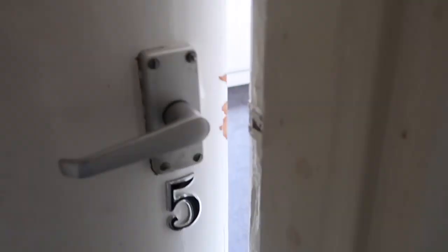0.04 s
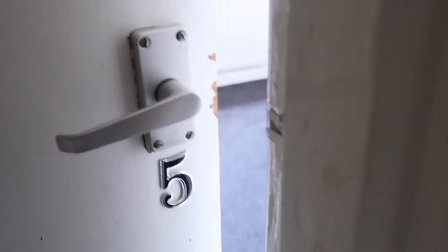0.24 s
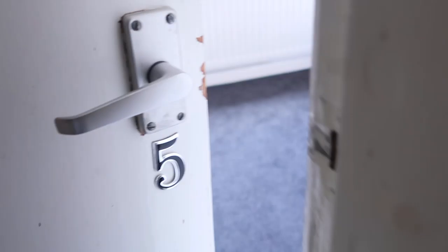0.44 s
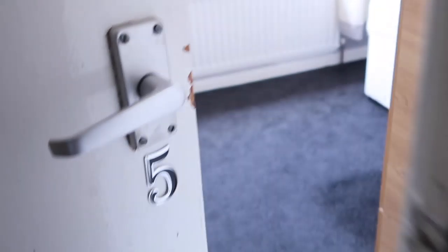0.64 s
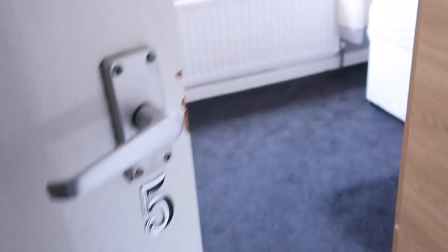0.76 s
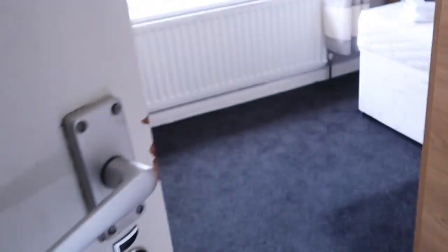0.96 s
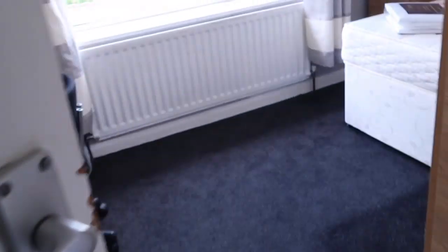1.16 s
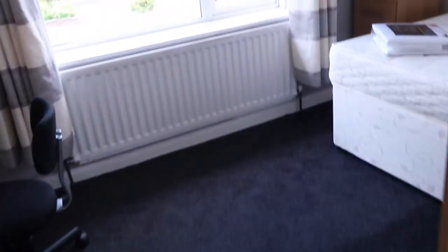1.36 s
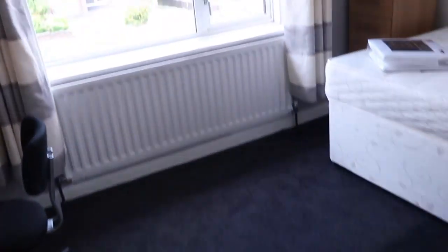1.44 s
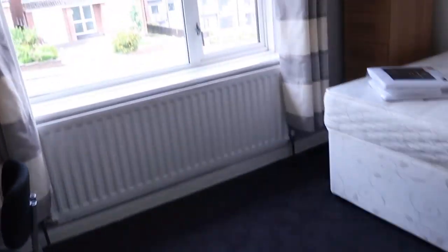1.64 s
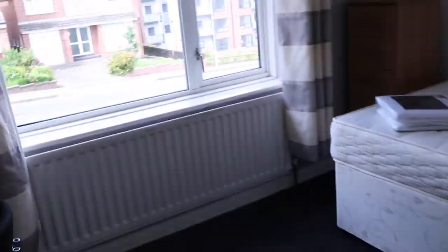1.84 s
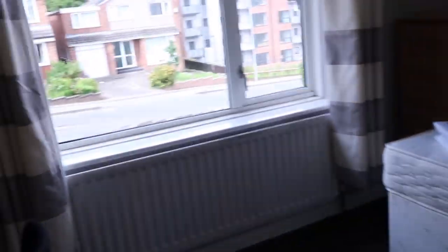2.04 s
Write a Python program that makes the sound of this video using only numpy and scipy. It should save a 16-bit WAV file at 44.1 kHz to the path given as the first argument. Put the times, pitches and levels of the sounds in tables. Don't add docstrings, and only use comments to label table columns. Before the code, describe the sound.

Squeaky door hinge: two short squeals, a falling groan, a latch snap and a late creak

```python
import sys
import numpy as np
from scipy import signal
from scipy.fft import rfft, irfft
from scipy.io import wavfile
from scipy.ndimage import uniform_filter1d

SR = 44100
rng = np.random.default_rng(int(sys.argv[2]) if len(sys.argv) > 2 else 0)


def int16_out(signal):
    q = np.round(np.clip(np.atleast_2d(signal).T, -1, 1) * 32767)
    wavfile.write(sys.argv[1], SR, q.astype(np.int16))


def volts(x):
    e = np.asarray(x, float) / 20
    return 10 ** e


N = 92962
T = np.arange(N) / SR
PORTS = np.array([[.5], [-.5]])


def shade(table, hz):
    table = np.array(table)
    return np.interp(np.log(np.maximum(hz, 1)), np.log(table[:, 0]), table[:, 1])


def unit(x):
    return x / np.sqrt(np.mean(x ** 2))


def noise(table):
    gain = volts(shade(table, np.fft.rfftfreq(N, 1 / SR)))
    return unit(irfft(rfft(rng.standard_normal(N)) * gain, N))


def band(x, hz, width_hz):
    return signal.lfilter(*signal.iirpeak(hz, hz / width_hz, fs=SR), x)


def bandpass(x, order, low_hz, high_hz):
    return signal.sosfilt(signal.butter(order, [low_hz, high_hz], "band", fs=SR, output="sos"), x)


def highpass(x, hz):
    return signal.lfilter(*signal.butter(2, hz, "high", fs=SR), x)


def walk(rate_hz, size=N):
    k = int(SR / rate_hz)
    drift = uniform_filter1d(rng.standard_normal(size + SR // 4), k)
    return unit(uniform_filter1d(drift, k))[:size]


def gate(start, end, edge_s):
    return np.clip(np.minimum(T - start, end - T) / edge_s + .5, 0, 1)


# hz, level_db (per Hz)
HUSH_MID_COLOUR = [(30, -23.5), (70, -6), (320, -0.5), (655, -11), (1560, -14), (5500, -24.5),
                   (8000, -30.5), (14000, -45)]
HUSH_SIDE_COLOUR = [(30, -36), (350, 6), (513, -4.5), (1400, -12), (3200, -15.5), (6000, -22), (9000, -30),
                    (14500, -40)]


def hush():
    return volts(-72) * noise(HUSH_MID_COLOUR), volts(-69.5) * noise(HUSH_SIDE_COLOUR)


# start_s, level_db
RUSTLE_LEVEL = [(0, -64), (.14, -66), (.36, -80.5), (1.2, -66), (1.35, -60), (1.6, -69), (1.8, -64.5),
                (2.11, -58.5)]
# hz, level_db (per Hz)
RUSTLE_COLOUR = [(24, -34), (119, -7), (243, -2.5), (574, -12), (900, -11), (5500, -31), (9000, -43),
                 (14000, -60.5)]


def rustle():
    level = volts(np.interp(T, *np.array(RUSTLE_LEVEL).T) + 4.4 * walk(53))
    return level * noise(RUSTLE_COLOUR), volts(-6.5) * level * noise(RUSTLE_COLOUR)


# peak_time_s, peak_db, pitch_hz, length_s, left_minus_right_db
CASING_BUMPS = [(0.404, -34, 142, 0.0076, -6), (0.417, -34.5, 133, 0.0095, 1), (0.473, -53, 92, 0.021, -1),
                (0.491, -38, 91, 0.0088, 1), (0.505, -32.5, 112, 0.0095, 2.5),
                (0.526, -24, 118, 0.012, 5.5), (.538, -26, 191, 0.014, -1.5), (0.546, -29.5, 164, 0.015, 6),
                (.535, -29.5, 326, 0.0082, 3.5), (0.561, -42.5, 150, 0.012, 5),
                (0.586, -47.5, 90, 0.017, -1.5), (0.601, -45.5, 75, 0.016, 4),
                (.612, -45.5, 91, 0.013, -5.5), (.64, -57, 130, 0.031, 8.5),
                (0.681, -46.5, 106, 0.014, 8.5), (0.7, -45, 119, 0.011, 3), (0.716, -56.5, 102, 0.027, -9),
                (0.978, -44.5, 139, 0.011, -4), (1.644, -57, 318, 0.0027, 8), (1.702, -47, 350, 0.006, -6),
                (1.717, -67, 300, 0.0026, 18), (1.811, -43, 220, 0.006, 1.5),
                (1.826, -43.5, 139, 0.0074, -1)]


def bumps():
    lag_s = .0012
    out = np.zeros((2, N))
    for s, db, hz, length_s, pan_db in CASING_BUMPS:
        envelope = np.exp(-(2 * (T - s) / length_s) ** 2)
        arrival = T - s - PORTS * np.tanh(pan_db) * lag_s
        out += volts(db + PORTS * pan_db) * envelope * np.cos(2 * np.pi * hz * arrival)
    return out


# start_s, peak_db, centre_hz, width_hz, decay_s
BOARD_TICKS = [(1.83, -47.5, 955, 297, 0.011), (0.31, -59, 645, 1126, 0.0087), (.742, -41, 1442, 697, 0.02),
               (.882, -39, 1400, 1710, 0.048), (1.99, -55.5, 3550, 300, 0.032),
               (1.451, -37, 1860, 2720, 0.028), (1.455, -60.5, 5560, 1490, 0.012),
               (1.46, -46, 313, 283, 0.024), (1.6565, -40, 2250, 870, 0.0015),
               (1.657, -51.5, 3850, 595, 0.0018), (1.6575, -49.5, 4520, 790, 0.0016)]
# start_s, peak_db, centre_hz, width_hz, decay_s
CLOSE_TICKS = [(.8, -66, 10550, 2470, 0.03), (.85, -64, 7500, 1034, 0.026), (1.16, -68, 9600, 2570, 0.019),
               (1.449, -62, 11300, 1600, 0.012), (1.45, -68, 8200, 1800, 0.01),
               (1.031, -49, 9900, 1800, 0.0016), (1.0315, -51, 11700, 1500, .0014),
               (1.031, -60, 6800, 3000, .001), (1.657, -54, 4350, 1400, 0.0015)]


def ticks(table):
    out = np.zeros(N)
    for s, db, hz, width_hz, decay_s in table:
        burst = rng.standard_normal(N) * (T > s) * np.exp(-np.abs(T - s) / decay_s)
        burst = bandpass(burst, 3, max(hz - width_hz / 2, 40), hz + width_hz / 2)
        out += volts(db) * burst / np.abs(burst).max()
    return out


# pitch_hz, level_db, decay_s
LATCH_MODES = [(750, -23, 0.0037), (1065, -1.5, 0.0035), (1553, -2.5, 0.0034), (1770, 9.5, 0.0022),
               (2250, 6.5, 0.0019), (2596, 7.5, 0.0028), (3070, -6, 0.0015), (3550, 1.5, 0.0028)]
# start_s, level_db
LATCH_CONTACTS = [
    (1.449, 0),
    (1.4505, 8),
    (1.4535, -20),
    (1.4583, 3),
    (1.4645, -7),
    (1.4708, -11),
    (1.4766, -6),
    (1.4886, -14),
    (1.494, -14),
    (1.506, -35),
]


def latch():
    t = T[:SR // 8]
    ring = sum(volts(db) * np.exp(-t / decay_s) * np.sin(2 * np.pi * hz * t) for hz, db, decay_s in LATCH_MODES)
    contact_s = .0009
    touch = sum(volts(db) * (T > s) * np.exp(-np.abs(T - s) / contact_s) for s, db in LATCH_CONTACTS)
    out = signal.fftconvolve(rng.standard_normal(N) * touch, ring)[:N]
    out = bandpass(out, 4, 600, 3900)
    return volts(-26) * out / np.abs(out).max()


# start_s, level_db, treble_db
CREAK_LEVEL = [
    (1.832, -48.5, -35),
    (1.857, -41.5, 3.5),
    (1.893, -36.5, 6),
    (1.932, -43, 4.5),
    (1.954, -39.5, 0),
    (1.968, -38, -5),
    (2, -41, 3),
    (2.07, -49, -12),
    (2.108, -46.5, -6),
]
# pitch_hz, width_hz, level_db
CREAK_BODY = [(347, 102, 1.5), (797, 140, -2), (1400, 230, -14), (1734, 330, -8), (2223, 177, -1),
              (3660, 560, -31), (4340, 310, -21.5)]


def creak():
    rate_hz, spacing_scatter, size_db = 520, .38, .5
    chance = rng.standard_normal((900, 2))
    at = (np.cumsum(np.exp(spacing_scatter * chance[:, 0]) / rate_hz) * SR).astype(int)
    slips = 0.091 * rng.standard_normal(N)
    slips[at[at < N]] += volts(size_db * chance[at < N, 1])
    s, level_db, treble_db = np.array(CREAK_LEVEL).T
    wood = np.zeros(N)
    for k, (hz, width_hz, db) in enumerate(CREAK_BODY):
        mode = unit(band(band(slips, hz, 1.63 * width_hz), hz, 1.67 * width_hz))
        mode_db = db + 2.1 * walk(50) + (hz > 4000) * np.interp(T, s, treble_db)
        wood += (-1) ** k * volts(mode_db) * mode
    return unit(wood) * volts(np.interp(T, s, level_db)) * gate(s[0], 3, 0.013)


# pitch_hz, width_hz, lift_db
LEAF_MODES = [(1456, 110, 7), (1762, 58, 9.5), (2010, 46, 2.5), (2418, 28, -14), (2550, 85, 5.5),
              (3113, 25, 12.5), (3860, 110, 7)]


def panel(hz):
    return sum(db / (1 + ((hz - f) / w) ** 2) for f, w, db in LEAF_MODES)


# hz, level_db
DOOR_RADIATION = [(200, -42), (450, -5.5), (1180, -3.5), (1800, -11), (2400, -12), (3300, -17),
                  (4800, -16.5), (6400, -48.5), (8000, -57.5)]


def hinge(stroke, tint):
    s, *controls = np.array(stroke).T
    size = SR // 4
    span = int(s[0] * SR) - 200 + np.arange(size)
    hz, db, bright, rough, even = (np.interp(T[span], s, v) for v in controls)
    rough = np.clip(rough, 0, 1)
    jitter = .055 * rough ** 2 * walk(260, size)
    phase = 2 * np.pi * np.cumsum(hz * (1 + jitter)) / SR
    cycles = np.sqrt(2) * np.sin(phase)
    for k in range(2, 16):
        gain_db = bright * np.log2(k) + even * (k % 2 == 0)
        gain_db = gain_db + shade(DOOR_RADIATION, k * hz) + shade(tint, k * hz) + panel(k * hz)
        wander_db = 3 * walk(50, size)
        breakup_db = 8 * rough * (np.tanh(2 * walk(170, size)) - 1)
        partial = np.sin(k * phase + rng.uniform(0, 2 * np.pi))
        cycles = cycles + np.sqrt(2) * volts(gain_db + wander_db + breakup_db) * partial
    cycles = cycles + rough * volts(-8 + bright) * noise(DOOR_RADIATION)[span] * (1 + np.cos(phase))
    out = np.zeros(N)
    out[span] = cycles * volts(db + 11 * rough ** 2 * np.tanh(2 * walk(150, size)))
    return out * gate(s[0], s[-1], .004)


# start_s, slip_rate_hz, level_db, brightness_db (per octave), roughness (0-1), even_overtones_db
LOW_SQUEAL = [
    (.738, 673.4, -37, -23, 0, -9.5),
    (.747, 592.8, -41, -3, 0.2, -5),
    (.757, 579.6, -30, -8, 0, -14.5),
    (.776, 580, -39, -5.5, .1, -11),
    (.788, 580, -41, -6, 0.2, 3.5),
    (.822, 573.5, -36.5, -12, 0.11, 1),
    (.85, 560.2, -32.5, -5.5, 0.3, -1),
    (.874, 600, -30.5, -5, 0.3, -2.5),
    (.888, 630, -38, -1, 0.3, 1.5),
]
JUMP = [
    (.884, 800, -36, -14, 0.52, -9),
    (.895, 778, -31, -4, 0.51, -6.5),
    (.91, 777.4, -32, -6, 0.32, 1.5),
    (.93, 773, -42.5, -2, 0.15, -1.5),
    (.942, 780, -55, 2.5, 0.24, 7),
    (.95, 758, -43, -0.5, 0.12, 7.5),
]
HIGH_SQUEAL = [
    (.948, 773, -36, -6.5, .15, 9),
    (.956, 765, -31.5, -13, 0.15, -3.5),
    (0.966, 757.5, -29, -8.5, .12, 0),
    (.981, 751.2, -36.5, -6.5, .1, -24),
    (0.991, 754.4, -31.5, -9, 0.1, 0),
    (1.006, 752, -35.5, -10.5, .1, -7.5),
    (1.022, 767, -41.5, -15.5, .1, -2.5),
    (1.045, 801, -51, -3.5, 0.1, 3.5),
]
LAST_SQUEAL = [
    (1.041, 785, -44.5, -9.5, 0.092, -4.5),
    (1.055, 791, -36, -10.5, .1, -7.5),
    (1.066, 797.5, -28.5, -12, 0.13, -2.5),
    (1.082, 817.5, -34, -4.5, 0.073, -0.5),
    (1.104, 828.4, -38, -11, .1, 7),
    (1.117, 804, -32.5, -10.5, 0.16, -2.5),
    (1.124, 800, -36.5, -5, 0.19, -13),
    (1.132, 745, -41.5, -2.5, 0.24, -7),
]
# hz, level_db
SQUEAL_TINT = [(900, 1), (1800, 2.5), (2350, 5.5), (2900, -1), (3500, 5), (4050, 0.5), (4700, -5.5),
               (6000, -4)]
FLAT = [(100, 0), (20000, 0)]


def squeals():
    low = hinge(LOW_SQUEAL, SQUEAL_TINT)
    out = low + volts(-4.5) * band(low, 580, 10.8)
    return out + sum(hinge(stroke, FLAT) for stroke in (JUMP, HIGH_SQUEAL, LAST_SQUEAL))


# start_s, slip_rate_hz, level_db, brightness_db (per octave), roughness (0-1), even_overtones_db
GROAN = [
    (1.132, 759.7, -42.5, -1, 0.46, -2.5),
    (1.141, 731, -34.5, -5.5, 0.65, 3),
    (1.155, 683.7, -41, 1, 0.25, -6.5),
    (1.161, 592, -38, 0.5, 0.57, 1.5),
    (1.166, 571.7, -38.5, -2.5, 0.44, 2),
    (1.186, 539.3, -37, -2.5, 1, -8),
    (1.193, 516.6, -42.5, 2.5, .7, -2.5),
    (1.212, 493.5, -44.5, 2, .8, 1),
]
GROAN_END = [
    (1.212, 431, -50.5, 4.5, 0.72, 0),
    (1.222, 410.7, -37, -5.5, 0.68, 0.0018),
    (1.228, 409.4, -38.5, -3, 0.39, 0.013),
    (1.234, 375.4, -48.5, -2, 0.83, 0.0049),
    (1.242, 365.6, -35, -8.5, 0.52, 0),
    (1.251, 375, -42.5, -8.5, 0.9, 0.009),
    (1.257, 351, -46.5, -22, 0.94, 0),
    (1.265, 365, -51.5, -15.5, 0.34, 0.01),
    (1.282, 330, -49, -19, 0.55, 0),
]
# hz, level_db
GROAN_TINT = [(900, 1.5), (1150, -2.5), (1500, 1), (2600, 1), (3500, 6.5), (4050, -2), (4700, -1),
              (6000, 12)]


def groan():
    return hinge(GROAN, GROAN_TINT) + hinge(GROAN_END, GROAN_TINT)


def room(x):
    t60_s, gap_s, damp_hz = .19, .004, 3000
    t = T[:SR // 2]
    tail = rng.standard_normal((2, len(t))) * volts(-60 * t / t60_s) * (t > gap_s)
    tail = signal.lfilter(*signal.butter(1, damp_hz, fs=SR), tail)
    tail = tail / np.sqrt(np.sum(tail[0] ** 2))
    mid, side = signal.fftconvolve(x[None], tail, axes=1)[:, :N] * volts(-10.5)
    return highpass(mid, 950), volts(2.5) * highpass(side, 2580)


def scene():
    door = highpass(squeals() + groan() + creak(), 220)
    clicks = latch() + ticks(BOARD_TICKS)
    close = ticks(CLOSE_TICKS)
    room_mid, room_side = room(door + volts(-9) * clicks)
    hush_mid, hush_side = hush()
    cloth_mid, cloth_side = rustle()
    mid = room_mid + door + clicks + hush_mid + cloth_mid + volts(-9) * close
    side = room_side + hush_side + cloth_side + close
    pan_db = 1.25
    return volts(PORTS * pan_db) * np.array([mid + side, mid - side]) + bumps()


def roll_off(x):
    return signal.sosfilt(signal.butter(12, 14800, fs=SR, output="sos"), x)


def record(dry):
    return roll_off(dry)


dry = scene()
out = record(dry)
int16_out(out)
```